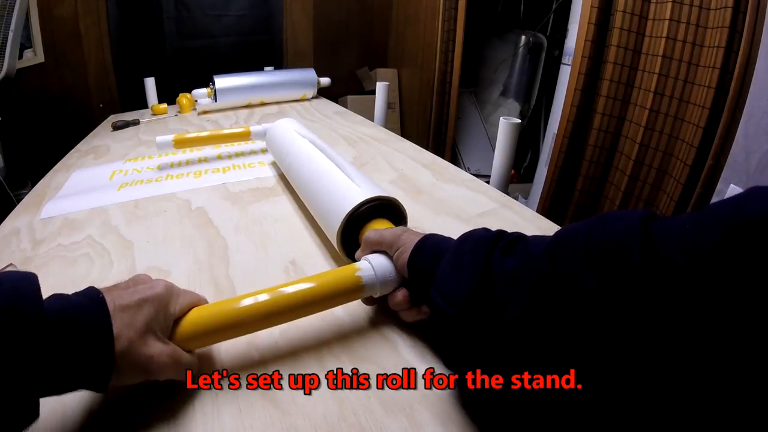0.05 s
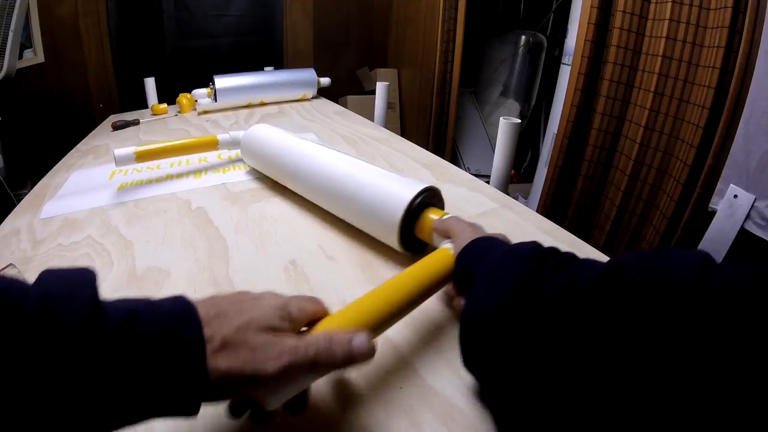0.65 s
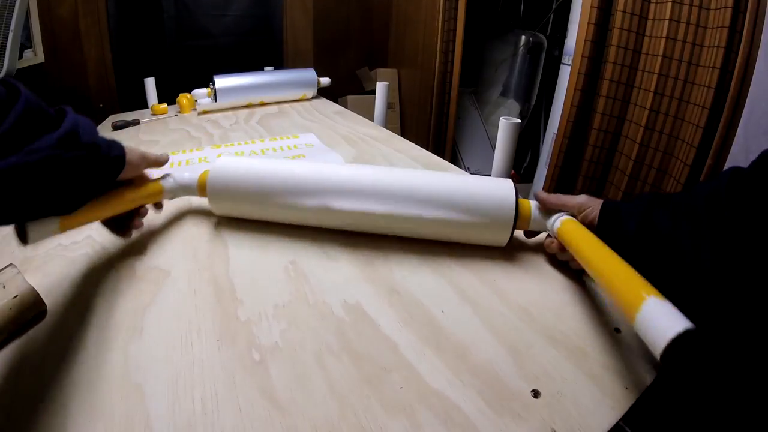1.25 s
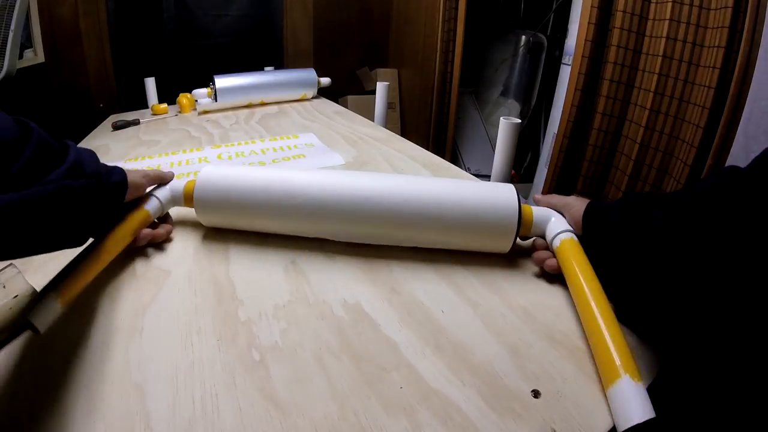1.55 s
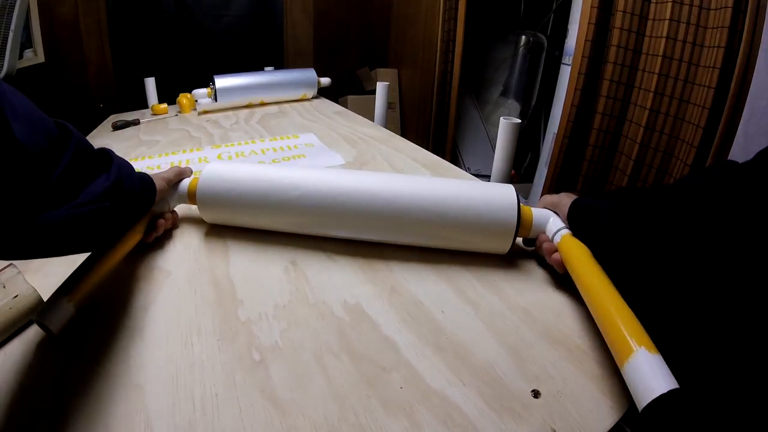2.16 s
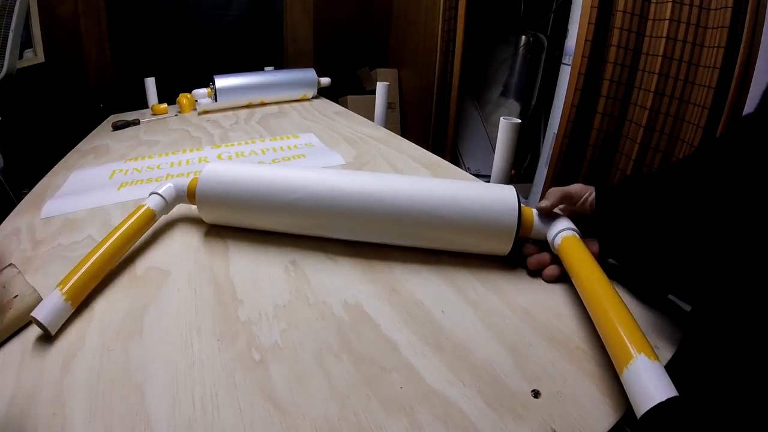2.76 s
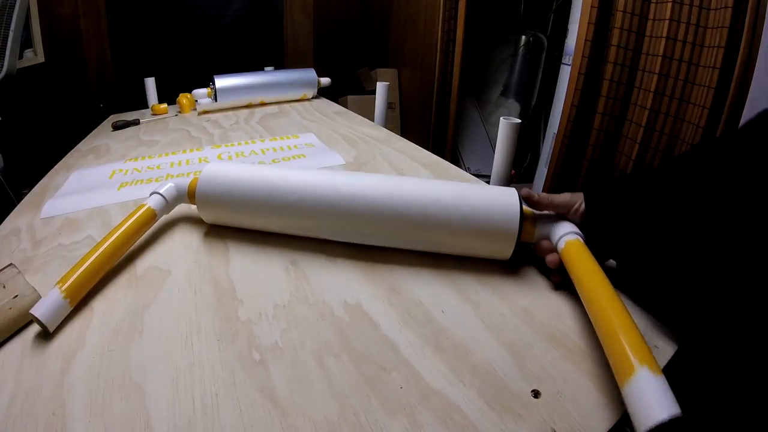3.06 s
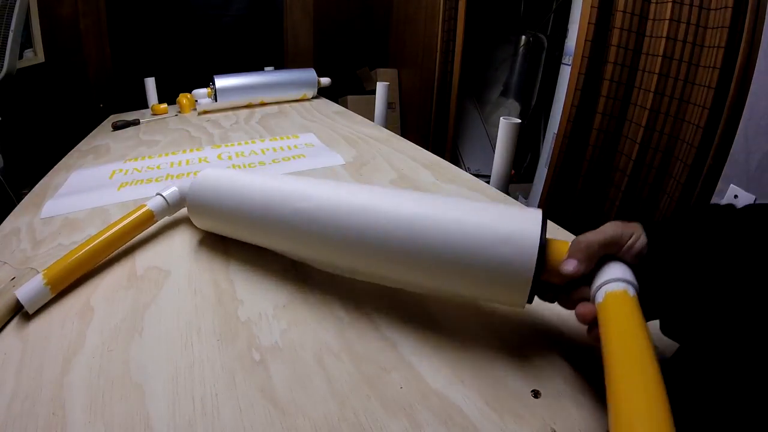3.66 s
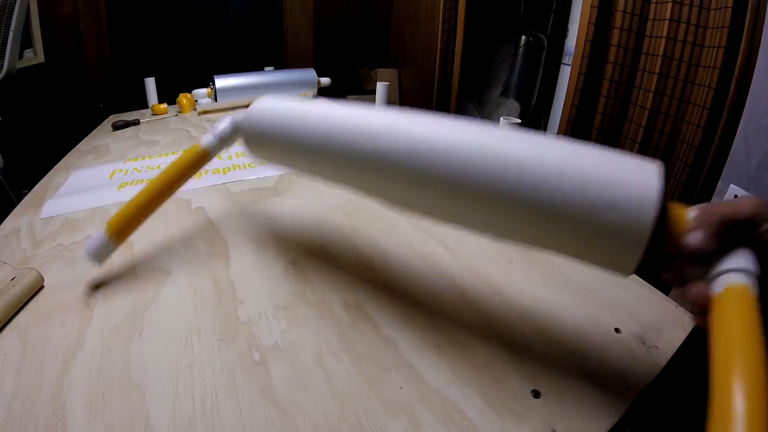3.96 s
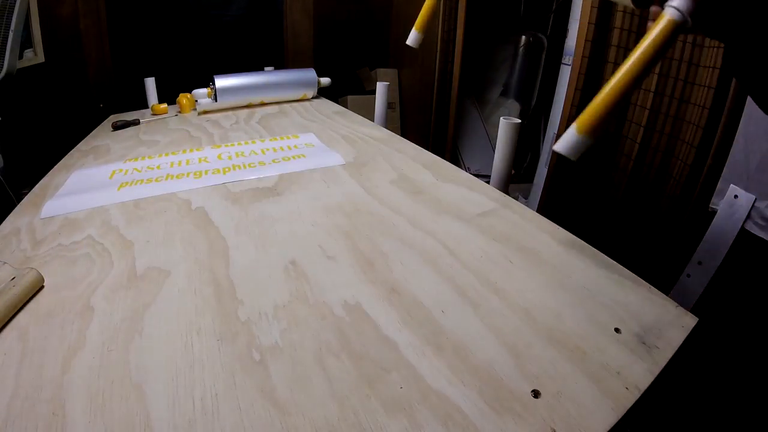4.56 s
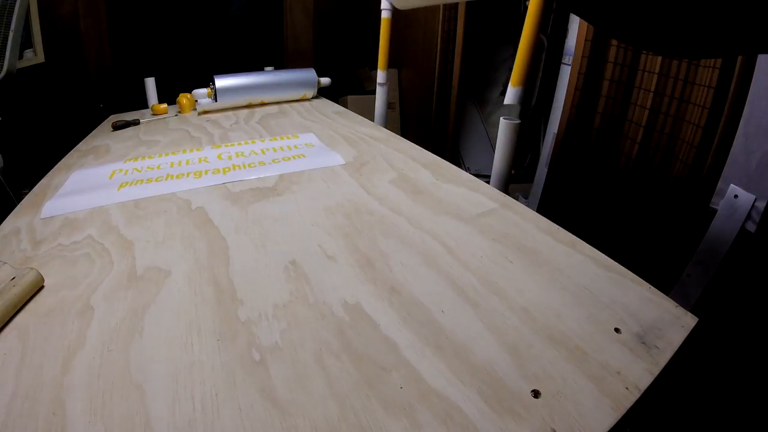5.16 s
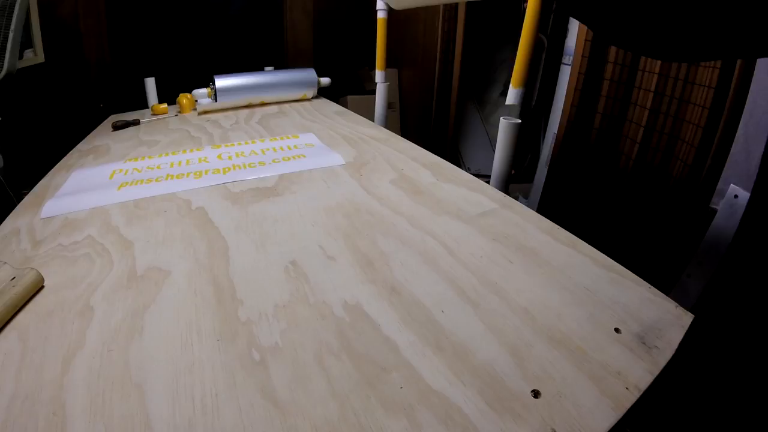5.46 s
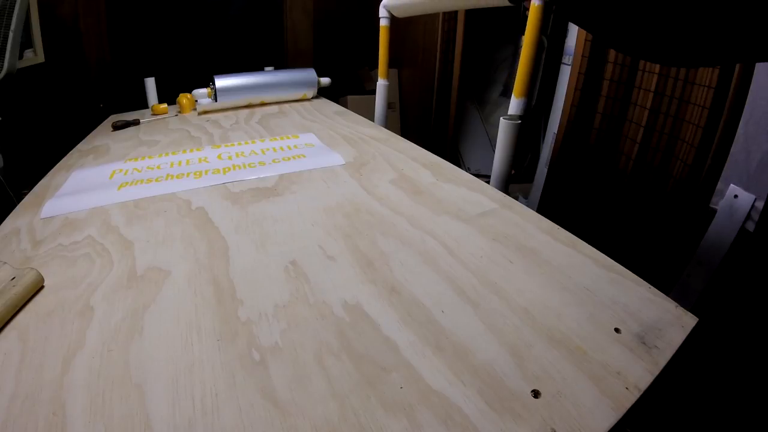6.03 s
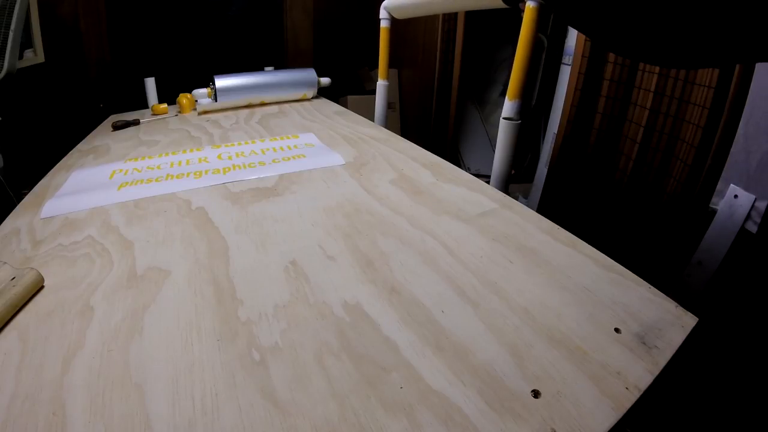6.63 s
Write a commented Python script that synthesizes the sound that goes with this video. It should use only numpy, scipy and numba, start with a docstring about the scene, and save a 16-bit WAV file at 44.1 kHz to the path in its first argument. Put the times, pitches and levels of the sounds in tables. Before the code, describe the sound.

Hands work a plastic pipe on a wooden table, with a low rumble, soft bumps and brushing sleeves. One loud hollow knock is followed by lighter ones, then the pipe scrapes briefly over the wood. After a lull it clunks against the pipes of a stand and taps a few times. A fan hums throughout, heard from one nearby microphone in a small workshop.

```python
"""A plastic pipe knocks on a plywood table, with soft bumps and the low rumble of hands at work.
The pipe is a handle carrying a roll of tape: it is swung round, set down, dragged, lifted and pushed
onto the pipes of a stand. Knocks and scrapes ring the board and pipes in a small wooden workshop.
Sleeves and the roll hiss as they slide, a joint squeaks faintly, and a fan hums throughout."""
import sys
import numpy as np
from scipy import signal
from scipy.fft import rfft, irfft, next_fast_len
from scipy.io import wavfile
from numba import njit

SR = 44100
rng = np.random.default_rng(int(sys.argv[2]) if len(sys.argv) > 2 else 0)


def output_pcm(signal):
    """Save a mono or channel-first signal as 16-bit PCM at the path in sys.argv[1].

    Samples are clipped to [-1, 1] before scaling.
    """
    pcm = np.clip(np.atleast_2d(signal).T, -1, 1) * 32767
    wavfile.write(sys.argv[1], SR, np.round(pcm).astype(np.int16))


N = 299439
TIME = np.arange(N) / SR
HIT_TIME = TIME[:SR // 2]  # each hit gets half a second

# Bare plastic hits the table. The thud lies between lowest_hz and contact_hz (higher when firmer).
# start_s, level_db, contact_hz, lowest_hz, click_db, click_top_hz, pipe_air_db
TABLE_HITS = [(.029, -19.5, 420, 85, -30.5, 12900, -22), (.463, -29, 600, 109, -38, 2430, -24),
              (1.255, -25.5, 378, 110, -44, 2480, -29.5), (1.346, -5.5, 1070, 223, -23.5, 9700, -16.5),
              (1.536, -18, 920, 201, -42, 8700, -32), (1.762, -16.5, 420, 335, -42.5, 2000, -17.5),
              (2.412, -36, 714, 200, -47, 9000, -46), (3.110, -26, 624, 244, -40, 2400, -26),
              (3.240, -25.5, 457, 240, -54, 5940, -23), (3.733, -40, 400, 221, -53, 5000, -38)]
# Pipe ends meet the stand: start_s, level_db, contact_hz, lowest_hz
STAND_HITS = [(5.126, -6, 706, 150), (5.156, -13.5, 620, 480), (5.222, -28.5, 493, 197),
              (5.527, -32.5, 193, 100), (5.624, -24.5, 790, 179), (5.642, -26, 955, 354),
              (5.656, -29, 970, 393), (6.054, -25.5, 327, 107)]
# Hands and roll bump the table: start_s, level_db
SOFT_BUMPS = [(0.203, -32.5), (0.344, -38.5), (0.718, -26.5), (.86, -35), (1.641, -42), (2.395, -30.5),
              (2.502, -35), (2.929, -29), (3.217, -25.5)]

# The tones each thing rings with: pitch_hz, level_db, ring_s (time to fade by 60 dB)
BOARD_TONES = [(115, -5, 0.26), (144.4, -17, 0.13), (168.2, -3, 0.17), (250, -6, 0.067), (338, -13, 0.08),
               (419, -9.5, .1), (463, 3.5, 0.072), (541, -0.5, 0.12), (647, -2, 0.13), (760, 2, 0.064),
               (846, -12.5, 0.14), (954, 4.5, 0.031), (998, -13.5, 0.092), (1130, -8, 0.098),
               (1530, -13, 0.093), (1914, -3, .08)]  # plywood with the pipe on it; each hit scales ring_s
STAND_TONES = [(117.3, -2, 0.18), (149, -6, 0.18), (208, -10, 0.12), (269.7, -4, 0.13), (318.4, -3, 0.098),
               (391.2, -10.5, 0.26), (524, -1.5, 0.15), (602.5, 6.5, 0.061), (662, -9.5, 0.18),
               (748, -10, 0.19), (933, -9, 0.087), (1480, -7, 0.063), (1930, -13.5, 0.14)]  # upright pipes; each hit scales ring_s
PIPE_AIR_TONES = [(295.9, 11, 0.15), (606, -13.5, 0.071)]  # air inside the handle
PIPE_WALL_TONES = [(2016, 1.5, 0.073), (2477, -8, 0.087), (3720, -5, .1), (4030, -5, 0.078),
                   (5120, -2.5, 0.066), (6900, -5.5, 0.054)]  # plastic wall, after a click

# The pipe drags over the board: start_s, length_s, level_db, final_push (0 to 1)
PIPE_DRAGS = [(3.115, 0.23, -35.5, 0.18), (3.789, 0.058, -30.5, 0.73)]
# Other movements: start_s, length_s, level_db
HAND_MOVES = [(0, 2.35, -41.5), (5.3, 1.8, -54.5)]  # hands work the pipes, at the table and then the stand
SLEEVE_MOVES = [(.53, 0.064, -56), (.76, 0.28, -50.5), (1.17, 0.093, -57.5), (2.39, .02, -58),
                (3.07, 0.19, -57), (3.21, 0.088, -57), (3.83, 0.018, -54.5)]  # sleeves and hands brush along
ROLL_MOVES = [(3.05, .2, -77), (3.85, 0.42, -62)]  # the roll slips on its axle
JOINT_MOVES = [(2.52, 0.31, -65)]  # a pipe turns in its elbow joint

# Narrow bands that rubbing sets ringing: pitch_hz, width_hz, level_db
DRAG_BANDS = [(240, 39, -6), (284, 45, 13), (470, 230, 6.5), (626, 45, 10.5), (743, 17, 11)]  # the gripped pipe
GRIT_BANDS = [(1020, 83, -19), (1760, 88, 11), (1924, 42, 13), (2080, 79, 0)]  # its harsh grating
AXLE_BANDS = [(5500, 630, 2.5), (6370, 600, -9), (10100, 2600, -7)]  # the roll's axle
JOINT_BANDS = [(3720, 130, 0), (4450, 200, -3), (6800, 250, -11)]  # the elbow joint

# Curves that shape noise from bass to treble: pitch_hz, gain_db
CLICK_CURVE = [(300, 9.5), (1000, 1.5), (2050, 6), (2650, -0.5), (3600, 5.5), (4100, 1), (5200, -1.5),
               (7500, -8.5), (10000, -17), (14000, -16)]  # hard plastic
HAND_CURVE = [(40, -1), (80, -9), (140, 0.5), (220, -14), (300, -3), (520, 0.5), (750, -8.5), (1200, -31),
              (3000, -59)]  # hands on pipes
SLEEVE_CURVE = [(500, -26), (1200, -28), (2100, 7), (2700, -4), (3200, 4), (4000, -5), (4800, 1),
                (5800, -6.5), (6600, -2), (7600, -11), (12500, -16), (15000, -37)]  # cloth and skin
LOW_AIR_CURVE = [(15, -12), (26, 2), (42, -7), (60, -8), (120, -6), (170, -8), (260, -13), (360, -13),
                 (460, -7), (560, -4.5), (660, -2.5), (780, -9), (1000, -20), (1250, -28), (2000, -60)]  # fan and room air below about 1 kHz
HIGH_AIR_CURVE = [(700, -26.5), (1200, -3), (1600, -3.5), (2080, 0), (2400, -11), (2800, -13.5),
                  (3500, -12), (3900, -17), (5200, -19), (7300, -24.5), (10000, -30), (13200, -35.5),
                  (14200, -41)]  # and above it
# The fan's hum: multiple (of the blade tone), level_db
HUM_TONES = [(1, -60), (3, -56.5), (6, -67), (7, -65), (8, -58), (9, -54)]


def knocks(hits, tones, room_s, room_db=-9, spread_s=0.0016):
    """Each knock is a plastic click, a thud of the struck thing and a hollow tone of air in the pipe."""
    wall_curve = [(70, -18.5), (140, 3.5), (600, -8), (1200, -14.5), (2500, -24.5), (6000, -46)]
    out = np.zeros(N)
    for start_s, db, contact_hz, lowest_hz, click_db, click_top_hz, pipe_air_db in hits:
        room = colour(echoes(room_s, build_s=0.0032), wall_curve)
        stretch = (contact_hz / 640) ** 0.53  # soft contact damps the ring, hard contact lets it last
        ring = ringing([(hz, tone_db, ring_s * stretch) for hz, tone_db, ring_s in tones])
        ring *= 1 - np.exp(-HIT_TIME / spread_s)  # the blow takes a moment to spread
        thud = unit_hit(ring) + gain(room_db) * unit_hit(room)
        thud = cut(thud, contact_hz, "low", order=3)  # soft contact leaves only low tones
        thud = cut(thud, lowest_hz, "high")
        add(out, start_s, gain(click_db) * plastic_click(click_top_hz))
        hollow = gain(pipe_air_db) * unit_hit(ringing(PIPE_AIR_TONES))
        add(out, start_s + 0.001012, gain(db) * unit_hit(thud) + hollow)  # just after the click
    return out


def plastic_click(top_hz, room_db=-4, wall_db=-11):
    """Hard contact makes a tiny burst of noise that echoes and briefly rings the pipe wall."""
    crack = rng.standard_normal(len(HIT_TIME)) * fade(ring_s=0.013)
    room = echoes(ring_s=0.17, build_s=0.0011)
    click = colour(unit_hit(crack) + gain(room_db) * unit_hit(room), CLICK_CURVE)
    wall = gain(wall_db) * unit_hit(ringing(PIPE_WALL_TONES))
    return unit_hit(cut(unit_hit(click) + wall, top_hz, "low", order=6))


def table_knocks(soft_hz=200, lowest_hz=103, click_top_hz=2500):
    """The board rings under bare plastic and under padded bumps, which have little click or hollow tone."""
    bumps = [(start_s, db, soft_hz, lowest_hz, db - 29, click_top_hz, db - 14.5)
             for start_s, db in SOFT_BUMPS]
    return knocks(TABLE_HITS + bumps, BOARD_TONES, room_s=0.25)


def stand_knocks(firm_hz=870, click_db_per_octave=18, click_top_hz=2890):
    """The stand's pipes ring as the handle meets them; firmer contact clicks louder."""
    hits = []
    for start_s, db, contact_hz, lowest_hz in STAND_HITS:
        click_db = db - 26.5 + click_db_per_octave * np.log2(contact_hz / firm_hz)
        hits.append((start_s, db, contact_hz, lowest_hz, click_db, click_top_hz, db - 15))
    return knocks(hits, STAND_TONES, room_s=0.19)


def pipe_drag(slips_per_s=1100, uneven_db=3, grit_db=-18.5, push_db=14):
    """The pipe sticks and slips in tiny jerks that ring it; a harder push sounds brighter and grates."""
    slips = (rng.random(N) < slips_per_s / SR) * gain(uneven_db * rng.standard_normal(N))
    ring = cut(resonate(slips, DRAG_BANDS), 190, "high", order=4)
    dull = unit(cut(ring, 350, "low"))
    bright = unit(cut(ring, 900, "low", order=4))
    grit = unit(cut(resonate(slips, GRIT_BANDS), 3900, "low"))
    out = np.zeros(N)
    for start_s, length_s, db, final_push in PIPE_DRAGS:
        # the push builds from just before the drag and drops after it
        push = np.interp(TIME - start_s, [-0.065, length_s, length_s + 0.15], [0, final_push, 0])
        rasp = np.sqrt(1 - push) * dull + np.sqrt(push) * bright + gain(grit_db + push_db * push) * grit
        out += rasp * swells([(start_s, length_s, db)], rise_s=0.2, fall_s=0.076)
    return out


def hand_rumble(uneven_db=2):
    """Hands working on the pipes make a low, uneven rumble."""
    effort = swells(HAND_MOVES, rise_s=0.1, fall_s=2.4) * gain(uneven_db * wander(24.77))
    return unit(colour(rng.standard_normal(N), HAND_CURVE)) * effort


def sliding_hiss(grain_db=2, uneven_db=1.5):
    """Fine, unsteady rubbing gives a broad hiss from sleeves and a narrower one from the roll's axle."""
    grains = rng.standard_normal(N) * gain(grain_db * rng.standard_normal(N) + uneven_db * wander(30))
    sleeves = unit(colour(grains, SLEEVE_CURVE))
    axle = unit(cut(resonate(grains, AXLE_BANDS), 10900, "low", order=4))
    return (sleeves * swells(SLEEVE_MOVES, rise_s=0.18, fall_s=0.15)
            + axle * swells(ROLL_MOVES, rise_s=0.14, fall_s=0.35))


def joint_squeak(uneven_db=2):
    """A pipe rubs as it turns in its elbow joint, ringing a few high, narrow bands."""
    ring = unit(cut(resonate(rng.standard_normal(N), JOINT_BANDS), 3000, "high"))
    return ring * swells(JOINT_MOVES, rise_s=0.096, fall_s=0.096) * gain(uneven_db * wander(18))


def fan(blade_hz=76, shake_hz=23, shake_db=-55, air_waver_db=0.38, waver_db=2):
    """Air rushes through the fan, over the wavering hum of its blades and a low shake."""
    air = sum(unit(colour(rng.standard_normal(N), curve)) * gain(db + air_waver_db * wander(11))
              for curve, db in [(LOW_AIR_CURVE, -41.5), (HIGH_AIR_CURVE, -51.5)])
    phase = 2 * np.pi * blade_hz * TIME + 0.2 * wander(6)
    hum = sum(gain(db + waver_db * wander(2.7)) * np.sin(multiple * phase + 2 * np.pi * rng.random())
              for multiple, db in HUM_TONES)
    shake = gain(shake_db + waver_db * wander(1.7)) * np.sin(2 * np.pi * shake_hz * TIME)
    return air + np.sqrt(2) * (hum + shake)


def echoes(ring_s, build_s):
    """Dense echoes from the close wooden walls build up, then die away."""
    return rng.standard_normal(len(HIT_TIME)) * fade(ring_s) * (1 - np.exp(-HIT_TIME / build_s))


def ringing(tones, vary_db=1, detune=0.0034):
    """Fading tones of a struck thing; place and grip shift each a little from hit to hit."""
    shifts = rng.standard_normal((len(tones), 2))
    return sum(gain(db + vary_db * louder) * fade(ring_s)
               * np.sin(2 * np.pi * hz * (1 + detune * higher) * HIT_TIME)
               for (hz, db, ring_s), (louder, higher) in zip(tones, shifts))


def swells(moves, rise_s, fall_s):
    """Loudness of movements: each grows 20 dB per rise_s, holds, then drops 20 dB per fall_s."""
    power = np.zeros(N)
    for start_s, length_s, db in moves:
        before = np.maximum(start_s - TIME, 0) / rise_s
        after = np.maximum(TIME - start_s - length_s, 0) / fall_s
        power += gain(db - 20 * (before + after)) ** 2
    return np.sqrt(power)


def resonate(x, bands):
    """Let a sound ring through several narrow bands."""
    return sum(gain(db) * signal.lfilter(*signal.iirpeak(hz, hz / width_hz, fs=SR), x)
               for hz, width_hz, db in bands)


def colour(x, curve):
    """Shape a sound's bass and treble along a curve of (pitch_hz, gain_db) points."""
    hz, db = np.transpose(curve)
    size = next_fast_len(2 * len(x))
    grid_hz = np.maximum(np.fft.rfftfreq(size, 1 / SR), 1)
    log_gain = np.log(gain(np.interp(np.log(grid_hz), np.log(hz), db)))
    # fold the filter forward in time, so nothing sounds ahead of a hit
    folded = irfft(log_gain, size)
    folded[1:size // 2] *= 2
    folded[size // 2 + 1:] = 0
    return irfft(rfft(x, size) * np.exp(rfft(folded)), size)[:len(x)]


def cut(x, hz, keep, order=2):
    """Keep the "low" or "high" side of hz; a higher order cuts more steeply."""
    return signal.sosfilt(signal.butter(order, hz, keep, fs=SR, output="sos"), x)


def wander(turns_per_s):
    """A random drift around zero, about 1 in size."""
    times = np.arange(256) / turns_per_s
    return np.interp(TIME, times, rng.standard_normal(len(times)))


def fade(ring_s):
    """Die away by 60 dB in ring_s."""
    return np.exp(-np.log(1000) * HIT_TIME / ring_s)


def gain(db):
    """Turn decibels into a multiplier."""
    return 10 ** (np.asarray(db) / 20)


def unit(x):
    """Scale a sound to an average power of 1."""
    return x / np.sqrt(np.mean(x ** 2))


def unit_hit(x):
    """Scale a hit to the energy of 20 ms at power 1."""
    return x / np.sqrt(np.sum(x ** 2) / (0.02 * SR))


def add(track, start_s, x):
    """Mix a sound into a track."""
    i = int(start_s * SR)
    track[i:i + len(x)] += x[:N - i]


@njit
def follow_level(x, rise_s, fall_s):
    """Track how loud a sound is, rising and falling at separate speeds."""
    out, level = np.empty(len(x)), 0.0
    for i in range(len(x)):
        gap = abs(x[i]) - level
        level += gap / (SR * (rise_s if gap > 0 else fall_s))
        out[i] = level
    return out


def scene():
    """All the sounds meet at one microphone above the table."""
    handling = table_knocks() + stand_knocks() + pipe_drag() + hand_rumble() + sliding_hiss()
    return (handling + fan() + joint_squeak())[None]


def record(dry, limit_db=-6, top_hz=15300):
    """A limiter dips the level after the hardest knocks; peaks are clipped and the top treble is cut."""
    level = follow_level(dry[0], rise_s=0.002, fall_s=0.4)
    limited = dry / np.maximum(level / gain(limit_db), 1)
    treble_cut = signal.ellip(8, 0.2, 70, top_hz, fs=SR, output="sos")
    return signal.sosfilt(treble_cut, np.clip(limited, -1, 1))


dry = scene()
out = record(dry)
output_pcm(out)
```